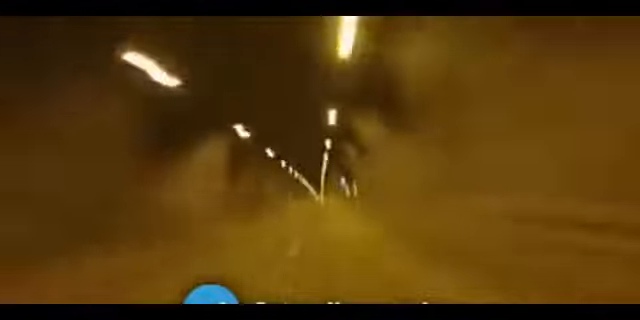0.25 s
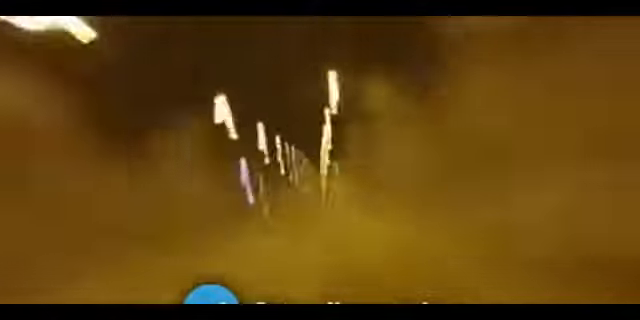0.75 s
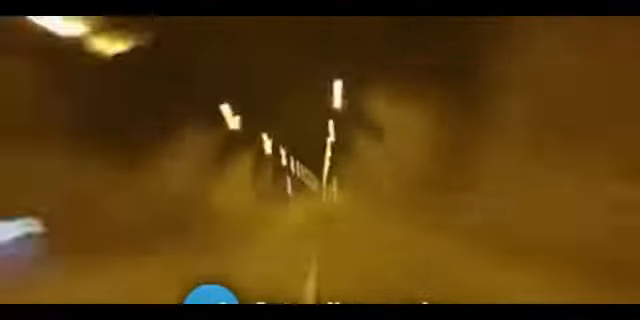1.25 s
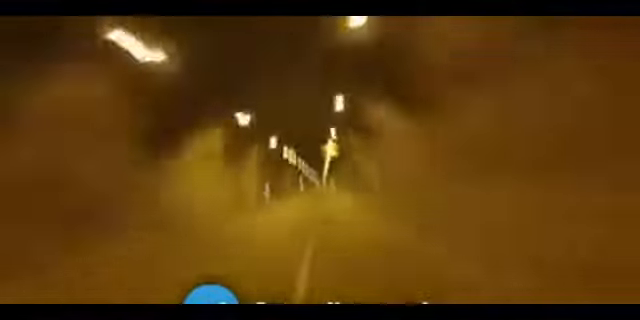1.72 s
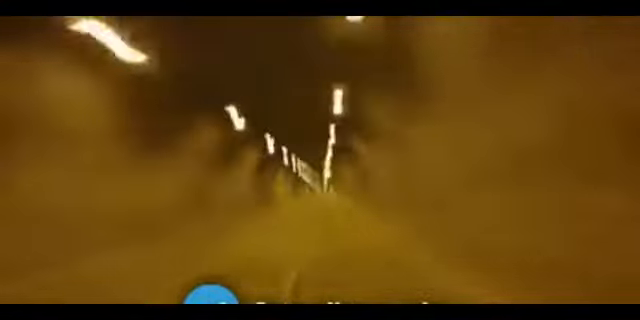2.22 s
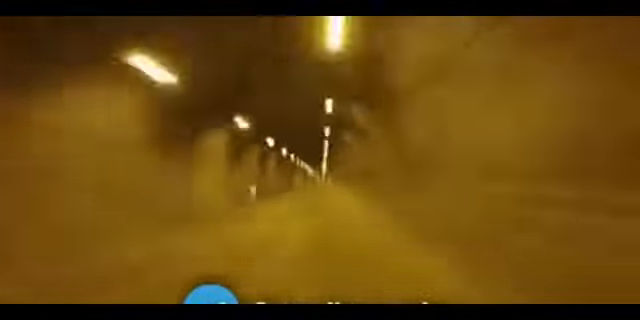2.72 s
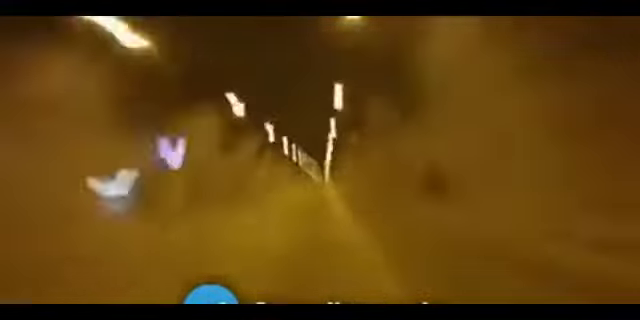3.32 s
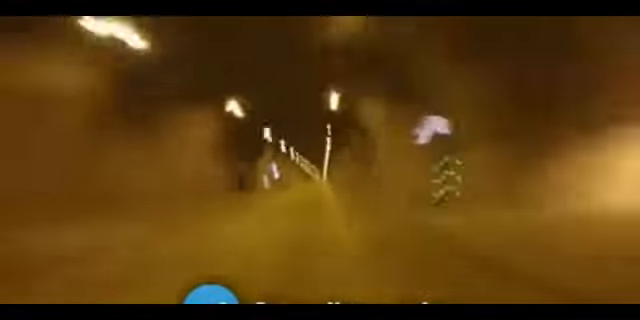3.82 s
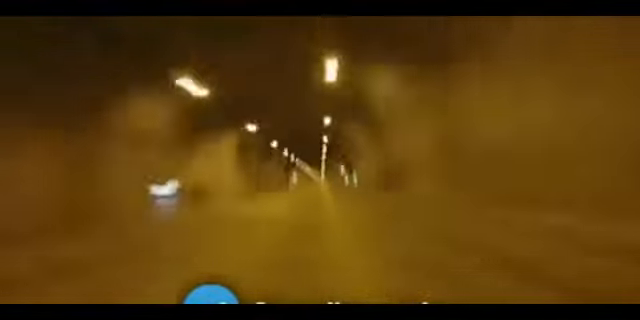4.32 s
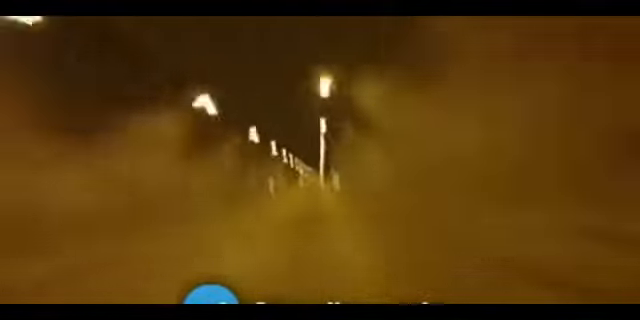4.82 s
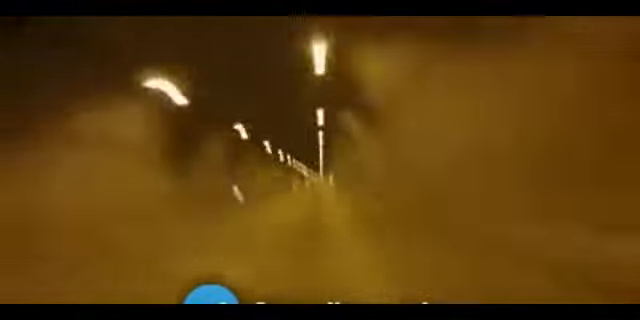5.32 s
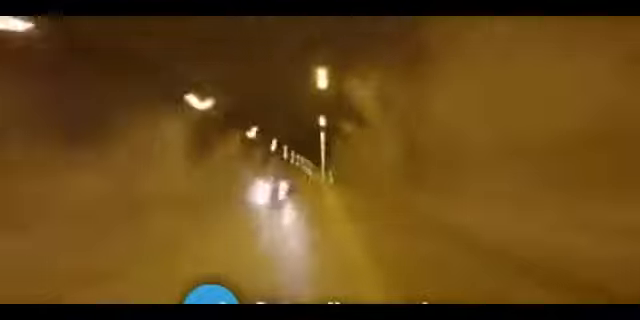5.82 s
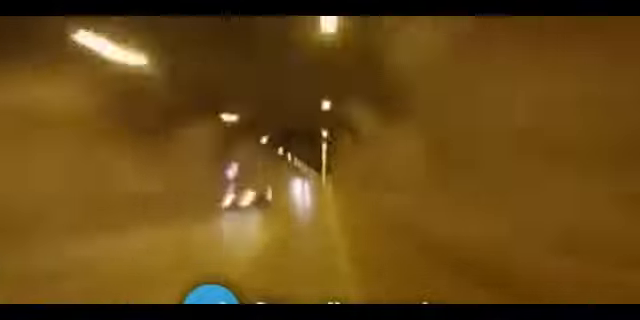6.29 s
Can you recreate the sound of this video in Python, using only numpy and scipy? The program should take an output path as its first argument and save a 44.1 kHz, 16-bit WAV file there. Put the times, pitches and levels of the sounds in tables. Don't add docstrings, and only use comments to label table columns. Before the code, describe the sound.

Close, rough on-board sound of a fast motorcycle in a tunnel: a nasal, wavering engine tone over a steady echoing roar. It drifts downward as the rider eases off, stutters and crackles, with heavy wind thumps briefly choking it, catches for an instant, stumbles again, then pulls cleanly and rises in pitch. Gusts keep buffeting; the treble is gritty and band-limited.

```python
import sys
import numpy as np
from scipy import signal
from scipy.fft import rfft, irfft, next_fast_len
from scipy.io import wavfile
from scipy.ndimage import uniform_filter1d

SR = 44100
rng = np.random.default_rng(int(sys.argv[2]) if len(sys.argv) > 2 else 0)


def digitize_waveform(pressure):
    field = np.atleast_2d(pressure).T
    bounded = np.clip(field, -1, 1)
    quanta = np.round(bounded * 32767).astype(np.int16)
    wavfile.write(sys.argv[1], SR, quanta)


def voltage_ratio(level):
    return 10 ** (np.asarray(level, float) / 20)


N = 288855

# t/s, opening [0-1], level of the half orders/dB
THROTTLE = [(0, 0, -8), (0.499, 0.2, -0.5), (1, 0.03, 3), (1.6, 0.2, 6), (2, 0, 5.5), (2.3, 0.09, 2),
            (2.45, 0.2, 5), (2.82, 0.25, 4.5), (2.855, 0.8, 1), (3.401, 1, 7), (3.899, 0.98, 2),
            (4.5, 0.9, -4), (5.201, 0.82, 1), (5.801, 1, -5.5), (6.55, 1, 1.5)]


def evened(x):
    return x / np.sqrt(np.mean(x ** 2) + 1e-20)


def read(points, hz):
    f, value = np.transpose(points)
    return np.interp(np.log(hz + 1), np.log(f + 1), value)


def curves(rows):
    s, *columns = np.transpose(rows)
    return [np.interp(np.arange(N) / SR, s, c) for c in columns]


def drift(top_hz, count=1):
    size = N // 32 + 2
    z = rfft(rng.standard_normal((count, size)))
    hz = np.fft.rfftfreq(size, 32 / SR)
    slow = evened(irfft(z / (1 + (hz / top_hz) ** 4), size))
    return np.array([np.interp(np.arange(N) / 32, np.arange(size), row) for row in slow])


def coloured(x, gain):
    size = next_fast_len(N)
    return irfft(rfft(x, size) * gain(np.fft.rfftfreq(size, 1 / SR)), size)[:N]


def span(start, length, edge):
    t = np.arange(N) / SR - start
    return np.clip(np.minimum(t, length - t) / edge + .5, 0, 1)


def resonance(hz, peak_hz, width_hz, boost_db):
    return boost_db / (1 + (2 * (hz - peak_hz) / width_hz) ** 2)


def opening():
    return np.clip(4 * (curves(THROTTLE)[0] - .28), 0, 1)


def raggedness():
    # t/s, length/s, raggedness [0-1]
    stumbles = [
        (1.628, .33, 0.97),
        (2.282, .15, 0.8),
        (2.487, 0.019, 0.6),
    ]
    floor = 0.11
    extra = sum((r - floor) * span(s, length, 0.035) for s, length, r in stumbles)
    return np.clip(floor + extra, 0, 1)


def firing_rate():
    # t/s, f/Hz, level/dB
    speed = [(0.0, 466.0, -12.6), (0.35, 450.8, -13), (0.7, 436, -12.5), (1.1, 426.7, -12.5),
             (1.6, 413.3, -11), (2.0, 402, -14), (2.27, 397, -13.5), (2.6, 396, -15), (2.9, 400.6, -12.9),
             (3.3, 411, -13.5), (3.8, 421.2, -13), (4.3, 432.4, -11), (4.8, 442.9, -11), (5.3, 454.4, -11),
             (5.8, 461.8, -11.5), (6.2, 469.2, -11.6), (6.55, 473.4, -12.5)]
    # t/s, half width/s, rate jump/Hz
    jolts = [
        (2.488, 0.02226, 20.07),
        (2.85, 0.0248, 6.98),
    ]
    hz, tone_db = curves(speed)
    t = np.arange(N) / SR
    snaps = [np.exp(-((t - s) / width) ** 2) for s, width, jump_hz in jolts]
    firings_per_wheel_turn = 37
    wheel_phase = 2 * np.pi * np.cumsum(hz) / SR / firings_per_wheel_turn
    wheel_hz = 1.7 * np.sin(wheel_phase + 1.05 * drift(2.05)[0])
    jump_hz = sum(row[2] * snap for row, snap in zip(jolts, snaps))
    return hz + wheel_hz + jump_hz, tone_db, snaps[0]


def engine():
    # f/Hz, level/dB
    pipe = [(100, -31), (210, -32.5), (330, -27), (620, -33), (1050, -31.5), (1450, -33.5), (1850, -33),
            (2300, -40), (2600, -38), (2900, -45.5), (3300, -44.5), (3700, -40.5)]
    # f/Hz, width/Hz, boost/dB
    fairing = [
        (2250, 260, 9),
        (3345, 260, 10),
    ]
    # f/Hz, throttle shut level/dB, open level/dB
    overtones = [(807, -20.5, -34.5), (846.4, -23.5, -21), (932, -14.5, -15.5), (1200, -21, -22.5),
                 (1223, -18, -17.5), (1290, -25, -26.5), (1347, -34, -34.5), (1366, -21.5, -35),
                 (1593, -25.5, -29.5), (1676, -35, -31.5), (1958, -23.5, -23.5), (2020, -38.5, -34.5),
                      (2092, -42, -25), (2174, -29, -32.5), (2343, -32, -26.5), (2324, -33.5, -32)]
    overtone_hz, shut_db, open_db = np.transpose(overtones)

    hz, tone_db, snap = firing_rate()
    throttle, mismatch_db = curves(THROTTLE)
    ragged = raggedness()
    opened = np.clip(opening() + snap, 0, 1)
    smooth_hz = uniform_filter1d(hz, size=4000)
    odd_db = -13.5 + 9.5 * throttle + .4 * mismatch_db
    turn = 2 * np.pi * np.cumsum(hz * (1 + 0.0022 * drift(40)[0])) / SR
    turn = turn + 0.58 * ragged * drift(60)[0]
    waver = drift(5.5, count=42)
    start = rng.random(42) * 2 * np.pi
    start[[3, 7]] = np.pi

    out = np.zeros(N)
    for k in range(1, 39):
        order_hz = k * hz / 4
        if k == 4:
            db = tone_db + 3 + 0.34 * waver[k - 1]
        elif k in (8, 12, 16, 20):
            at = smooth_hz * k / 4
            closed_db = np.interp(at, overtone_hz, shut_db) - 3.0 + 14 * np.minimum(throttle, .3)
            db = (1 - opened) * closed_db + opened * np.interp(at, overtone_hz, open_db)
            db = db + 4.0 + 1.25 * waver[k - 1]
        else:
            if k % 4 == 0:
                share_db = 1.5
            elif k % 2 == 0:
                share_db = -4.0 + mismatch_db
            else:
                share_db = odd_db - 4 * (k < 4)
            db = read(pipe, order_hz) + share_db + 3 * throttle + 1.9 * waver[k - 1]
            db = db + (1 - opened) * resonance(order_hz, 598, 30, 7)
            if k > 16:
                db = db + sum(resonance(order_hz, *panel) for panel in fairing)
        phase = k * turn / 4 + start[k - 1] + 0.013 * k * waver[-k]
        out += voltage_ratio(db - 0.61 * k * ragged) * np.cos(phase)
    return out * voltage_ratio(1.5 * ragged * drift(40)[0]), turn


def burble():
    # f/Hz, density/dB per Hz
    burble_colour = [(30, -25), (80, -3), (200, -14.5), (300, -7.5), (520, 4), (650, -9), (800, -11.5),
                     (1050, -1), (1350, -16), (1700, -16.5), (2200, -18.5), (3700, -33)]
    pops = rng.standard_normal(N) * voltage_ratio(2.5 * drift(120)[0] + 2.2 * drift(40)[0])
    pops = evened(coloured(pops, lambda hz: voltage_ratio(read(burble_colour, hz))))
    return voltage_ratio(-17) * raggedness() * pops


def crackle():
    pops = rng.standard_normal(N) * voltage_ratio(5 * drift(70)[0])
    pops = coloured(pops, lambda hz: hz ** 2 / (1500 ** 2 + hz ** 2) / (1 + (hz / 2500) ** 2))
    return voltage_ratio(-29) * span(1.69, .13, .04) * evened(pops)


def gusts():
    # t/s, level/dB
    gust_peaks = [(.03, -27.5), (.6, -25.5), (.7, -29.5), (1.0, -24.5), (1.131, -25), (1.6, -22),
                  (1.71, -18), (1.788, -22), (1.87, -23.5), (2.0, -32), (2.169, -20.5), (2.42, -25.5),
                  (2.55, -19.5), (2.749, -21.5), (2.96, -26), (4.1, -25.5), (4.46, -24.5), (4.67, -28),
                  (4.93, -24), (5.09, -16), (5.18, -18.5), (5.331, -25), (5.6, -31), (5.76, -22),
                  (5.9, -26.5), (6.05, -22.5), (6.15, -27.5), (6.35, -21.5), (6.43, -19.5), (6.53, -20)]
    t = np.arange(0, N, 32) / SR
    power = voltage_ratio(-32) ** 2
    for s, db in gust_peaks:
        time_constant = np.where(t < s, 0.03, 0.034)
        power = power + (voltage_ratio(db) * np.exp(-abs(t - s) / time_constant)) ** 2
    return np.interp(np.arange(N) / SR, t, np.sqrt(power))


def wind():
    # f/Hz, density/dB per Hz
    wind_colour = [(12, -44.5), (20, -28.5), (43, -4.5), (155, -1), (253, -0.5), (306, -1.5), (340, 2.5),
                   (440, -12), (750, -120)]
    # t/s, peak level/dB
    slaps = [(0.597, -16.5), (0.997, -23), (1.391, -19.5), (1.583, -18), (1.714, 0), (1.767, -5.5),
             (1.809, -23.5), (1.837, 0), (1.866, 2), (1.944, -1), (2.324, -5), (2.389, -4.5), (2.425, -2.5),
             (2.553, -11.5), (2.717, -15.5), (2.81, -14), (4.276, -30), (4.849, -24), (5.074, -16),
             (5.09, -14), (5.178, -20.5), (5.323, -26), (6.04, -15), (6.333, -20), (6.421, -23.5)]
    lumps = coloured(rng.standard_normal(N), lambda hz: voltage_ratio(read(wind_colour, hz)) / (1 + (hz / 450) ** 3))
    heard = gusts() * voltage_ratio(3.7 * drift(33)[0]) * evened(lumps)
    push = np.zeros(N)
    u = np.arange(-12, 12, 1 / (SR * .0012))
    for s, db in slaps:
        first = round(s * SR) - len(u) // 2
        part = slice(first, first + len(u))
        heard[part] += voltage_ratio(db - 7.5) * (1 - u ** 2) * np.exp(-u ** 2 / 2)
        heard[part] += voltage_ratio(db - 23.0) * u * np.exp(-u ** 2 / 30)
        push[part] += voltage_ratio(db + 13) * np.exp(-(u + 1.3) ** 2 / 12)
    return heard, push


def roar(turn):
    # f/Hz, density/dB per Hz
    roar_colour = [(88, -55), (150, -29.5), (376, -21.5), (404, -15.5), (439, -4), (477, -9), (564, -11),
                   (894, -11.5), (3010, -21), (3310, -23.5), (3700, -22.5), (4200, -48), (5460, -69),
                   (9240, -120)]
    hz = np.fft.rfftfreq(1024, 1 / SR)
    a, b, patches = rng.standard_normal((N // 256 + 5, 513, 3)).T
    patches = evened(uniform_filter1d(uniform_filter1d(patches, 10, 0), 12, 1))
    gain = voltage_ratio(read(roar_colour, hz)[:, None] + 2.2 * patches) * (hz < 4300)[:, None]
    noise = evened(signal.istft((a + 1j * b) * gain, nperseg=1024, noverlap=768)[1][:N])
    throttle, mismatch_db = curves(THROTTLE)
    level_db = -27.5 + 3.2 * throttle - .2 * mismatch_db - 0.53 * raggedness()
    return voltage_ratio(level_db) * noise * (1 + .4 * np.cos(turn))


def scene():
    tones, turn = engine()
    heard, push = wind()
    compliance = 1 / np.cosh(np.clip(push, -6, 6)) ** 2
    return (tones * compliance + burble() + crackle() + heard + roar(turn))[None]


def copied_levels():
    # t/s, length/s, lower band level/dB, upper band level/dB
    sags = [(0.312, 0.058, -3.5, -13.5), (.41, .08, -2, -23.5), (.87, .04, -5, -8), (1.059, .04, 2.5, -7),
            (1.33, 0.037, -1, -14), (1.43, .08, -2.5, -17.5), (1.617, .05, -0.5, -14.5),
            (1.817, .13, -6.5, -5.5), (2.032, 0.031, -3, -15), (2.378, 0.091, -4, -11.5),
            (2.558, 0.082, -0.5, -9), (3.059, 0.063, 0.5, -22), (3.614, 0.055, 2, -7.5),
            (4.08, 0.045, 1, -10.5), (5.005, .08, -1.5, -7.5), (5.095, 0.1, -1, -18.5),
            (5.47, 0.07, -1, -15.5), (5.937, .04, -0.5, -10.5), (6.071, 0.046, -1, -9.5)]
    throttle, mismatch_db = curves(THROTTLE)
    open_db = 3.5 * opening()
    lower_db = -36.5 + 3 * throttle + 0.05 * mismatch_db + open_db
    upper_db = -54 + 4 * throttle + open_db
    for s, length, lower_sag_db, upper_sag_db in sags:
        inside = span(s, length, .015)
        lower_db = lower_db + lower_sag_db * inside
        upper_db = upper_db + upper_sag_db * inside
    return lower_db, upper_db


def copied_treble(x):
    # f/Hz, density/dB per Hz
    treble_colour = [(2290, -30), (3900, 1), (4010, 2.5), (4090, 1), (4240, 2.5), (4810, 0.5), (4970, -1.5),
                     (5910, 0), (8430, -12.5), (11000, -30), (18500, -120)]
    split_hz, shift_hz, upper_hz, edge_hz = 3790, 3445, 7750, 8650
    window = dict(nperseg=2048, noverlap=1536)
    hz, t, z = signal.stft(x, SR, **window)
    power = uniform_filter1d(abs(z) ** 2, 7, 1) + 1e-14
    around = uniform_filter1d(power, 30, 0)
    weak = uniform_filter1d(power, 3, 0) < voltage_ratio(hz / 600 - 14)[:, None] * around
    z = z * (1 - .93 * weak * np.clip((hz[:, None] - 1300) / 1200, 0, 1))

    fill = rng.standard_normal(z.shape) + 1j * rng.standard_normal(z.shape)
    flat = z / np.sqrt(around)
    top = np.roll(flat, round(shift_hz / hz[1]), 0) + 0.81 * fill
    top = top * voltage_ratio(read(treble_colour, hz))[:, None]
    blocks = rng.standard_normal((len(hz) // 16 + 1, len(t) // 6 + 1))
    top = top * voltage_ratio(1.4 * np.kron(blocks, np.ones((16, 6)))[:len(hz), :len(t)])

    out = signal.istft(z * (hz < split_hz)[:, None], SR, **window)[1][:N]
    for low, high, db in zip((split_hz, upper_hz), (upper_hz, edge_hz), copied_levels()):
        band = top * ((hz >= low) & (hz < high))[:, None]
        out += voltage_ratio(db) * evened(signal.istft(band, SR, **window)[1][:N])
    s = np.arange(N) / SR
    whistle = voltage_ratio(-58) * np.sin(2 * np.pi * 7748.5 * s)
    return out + whistle * (s > .49) * (s < .92)


def top_cut(x):
    return signal.sosfilt(signal.butter(12, 8580, fs=SR, output="sos"), x)


def record(dry):
    overloaded = 0.96 * np.tanh(dry[0] / 0.83)
    heard = coloured(overloaded, lambda hz: hz ** 2 / (hz ** 2 + 22 ** 2))
    mix = copied_treble(heard)[None]
    return top_cut(mix)


dry = scene()
out = record(dry)
digitize_waveform(out)
```